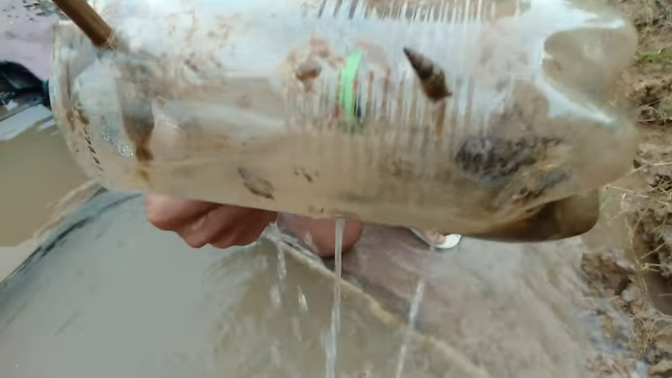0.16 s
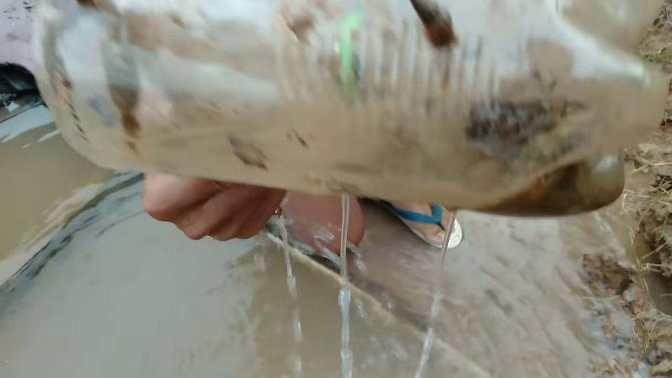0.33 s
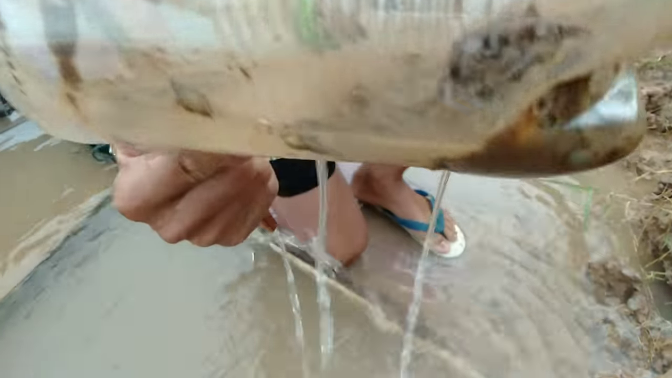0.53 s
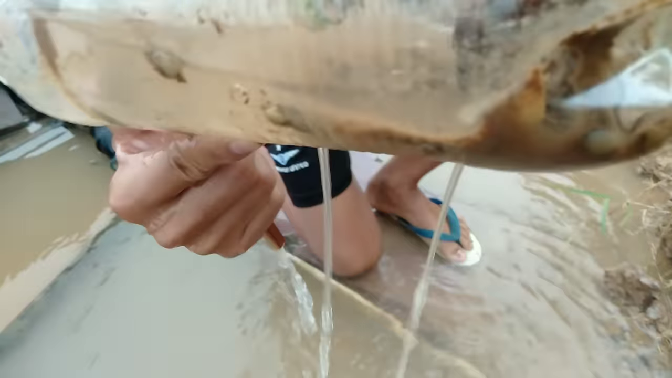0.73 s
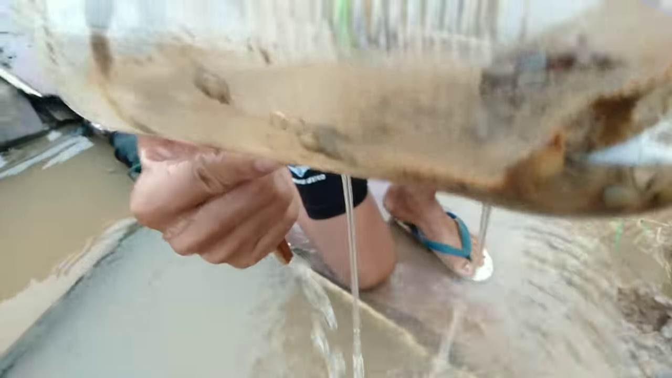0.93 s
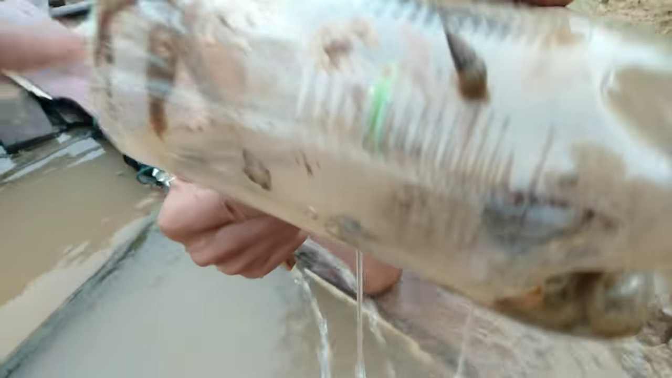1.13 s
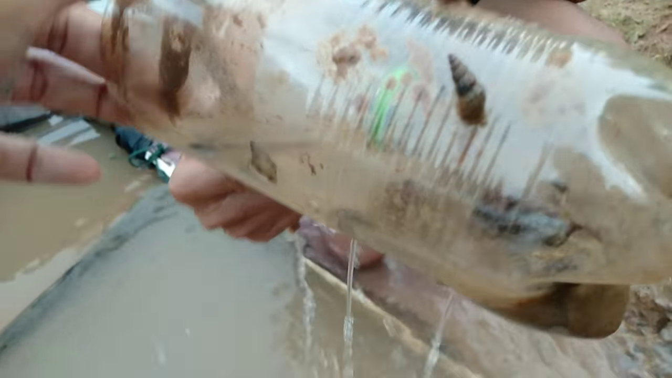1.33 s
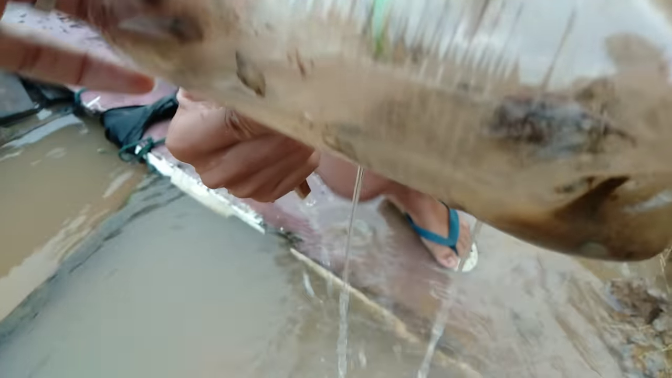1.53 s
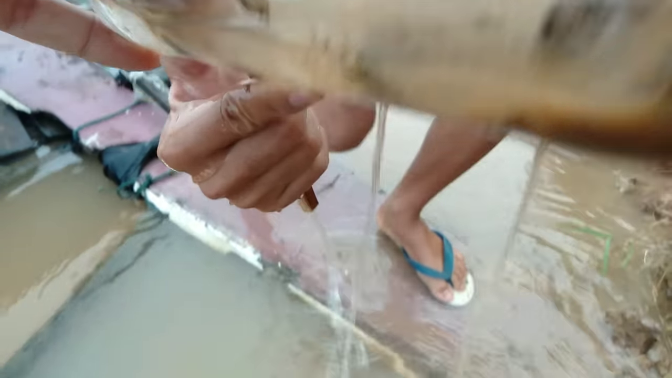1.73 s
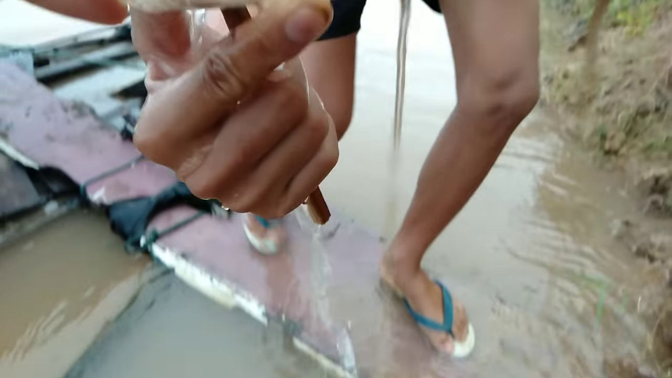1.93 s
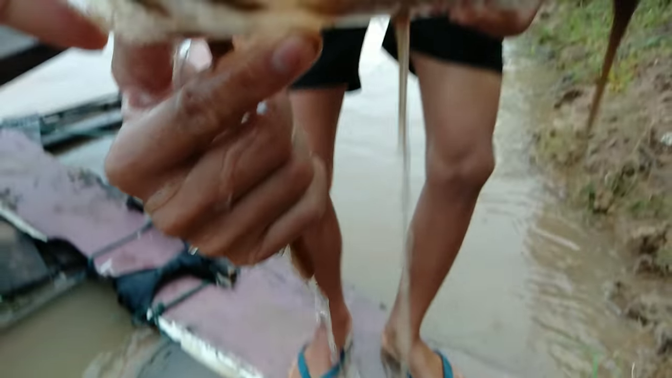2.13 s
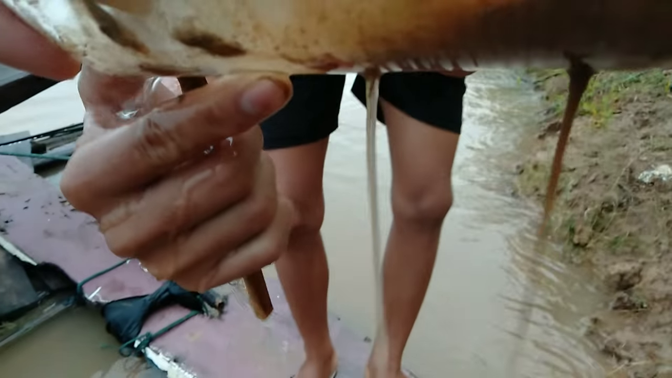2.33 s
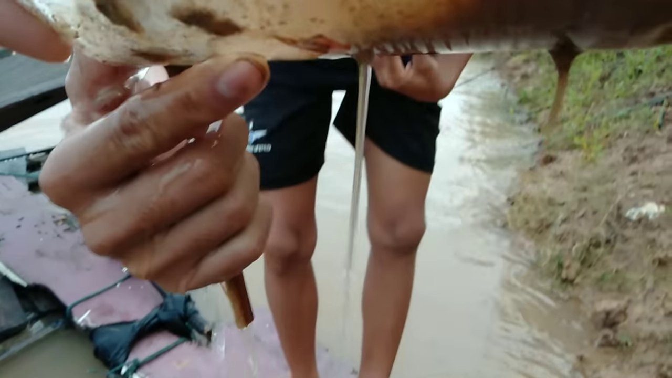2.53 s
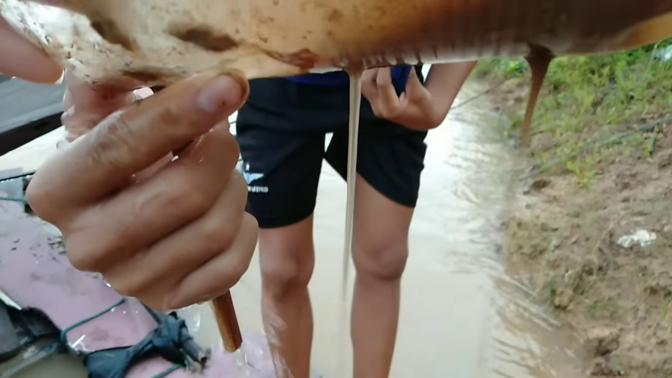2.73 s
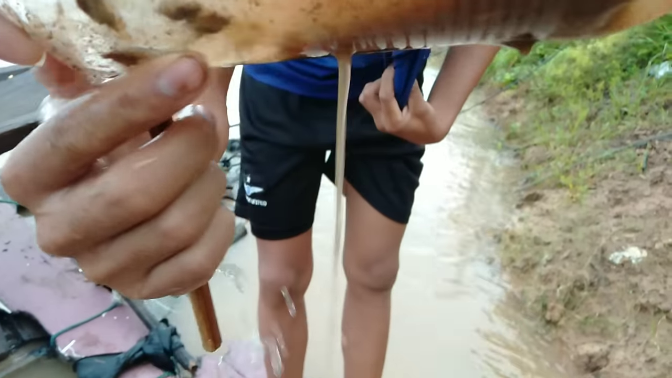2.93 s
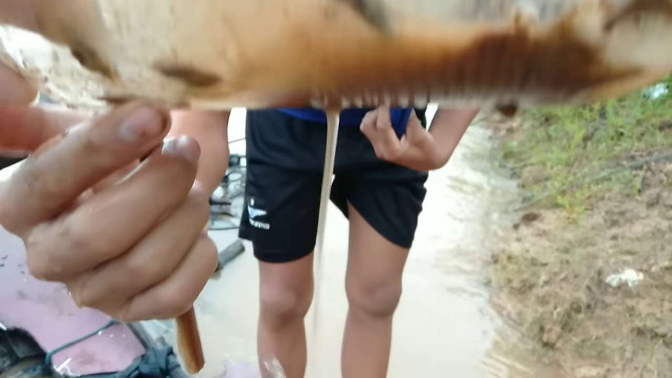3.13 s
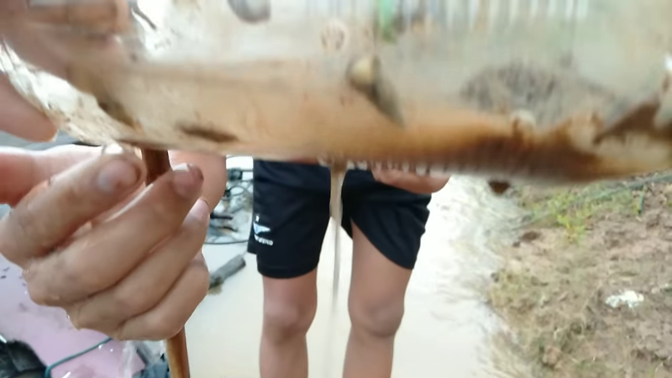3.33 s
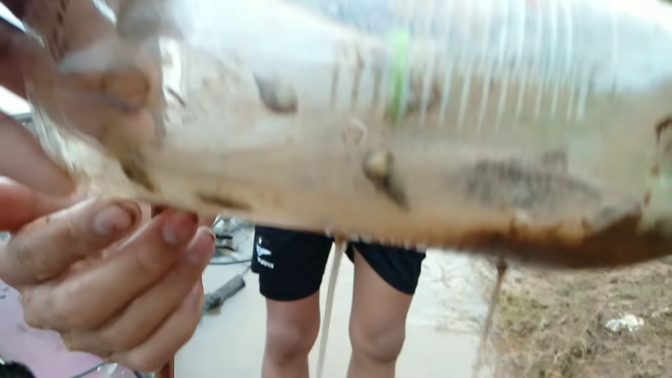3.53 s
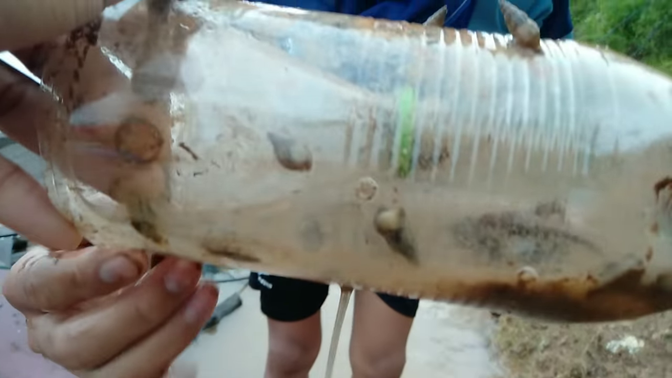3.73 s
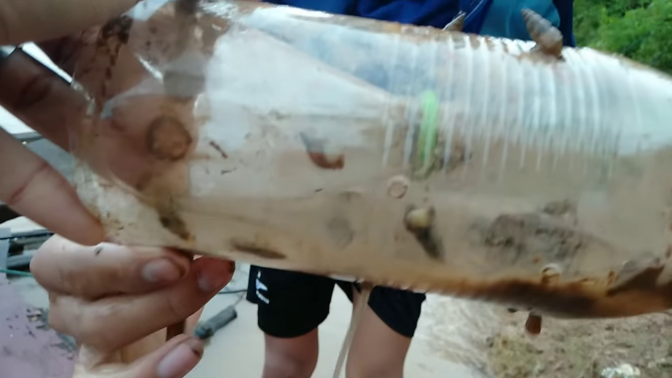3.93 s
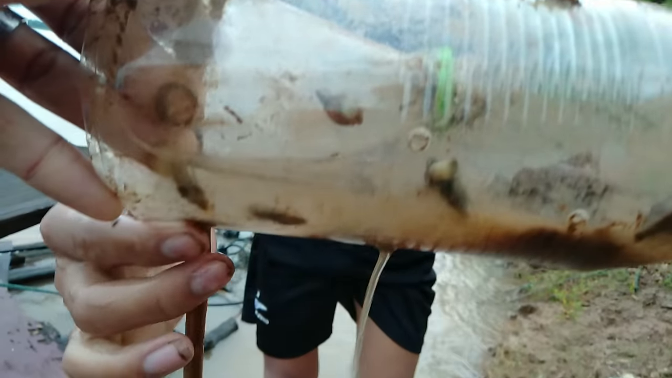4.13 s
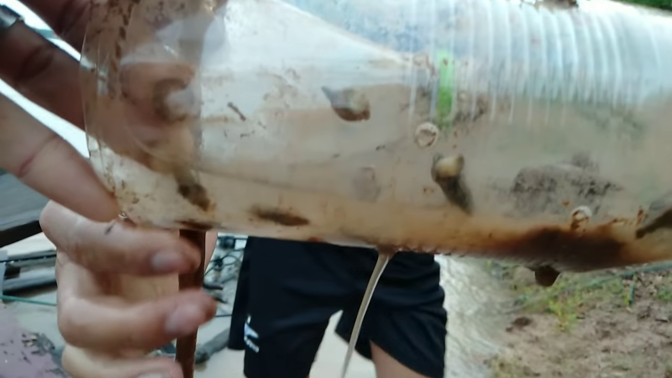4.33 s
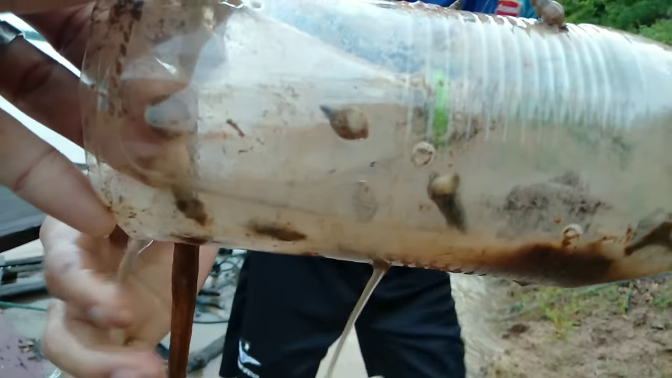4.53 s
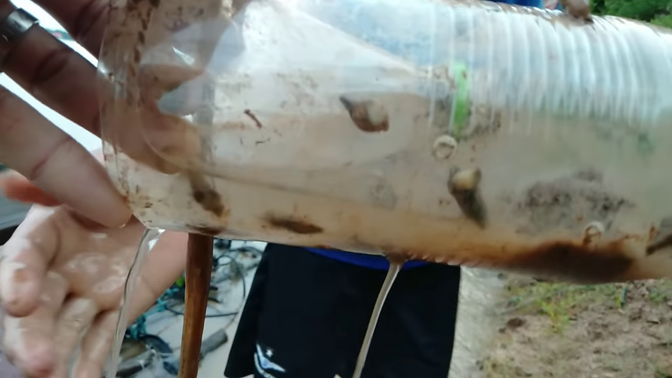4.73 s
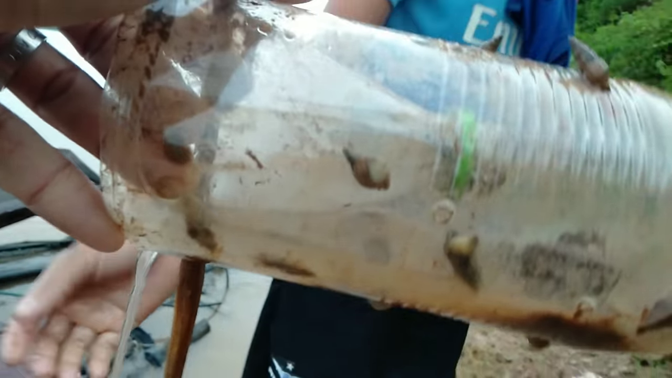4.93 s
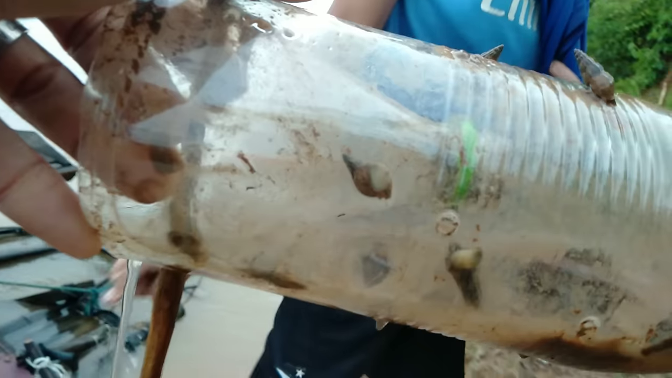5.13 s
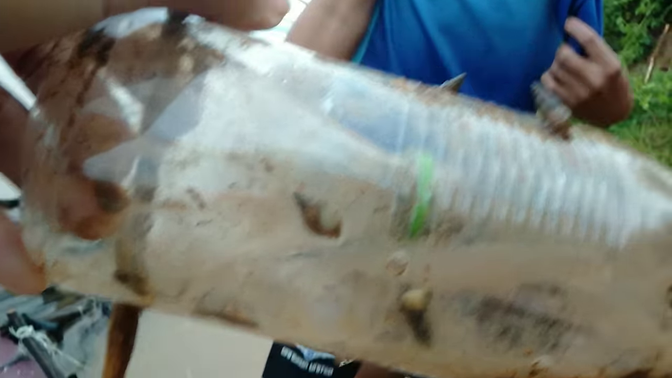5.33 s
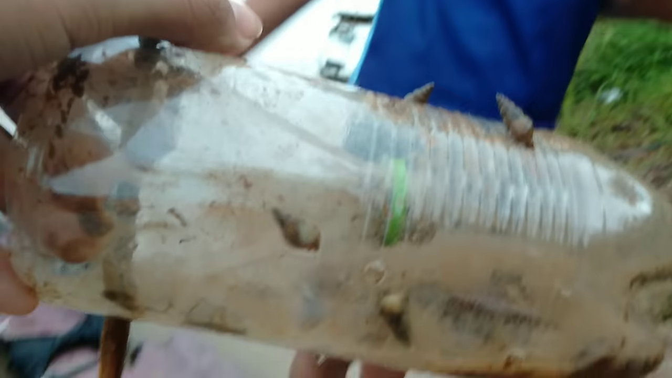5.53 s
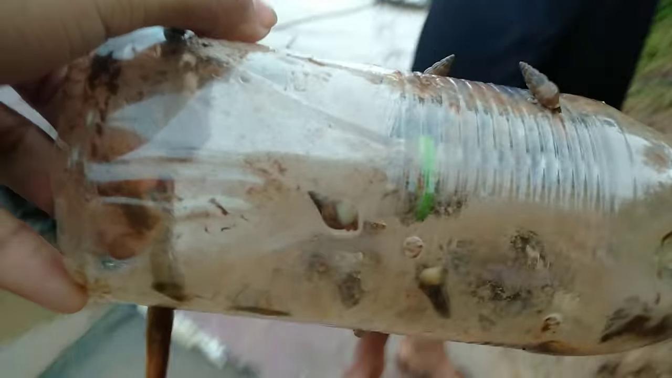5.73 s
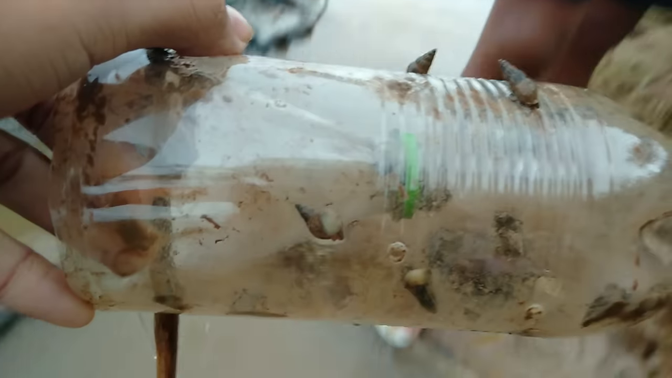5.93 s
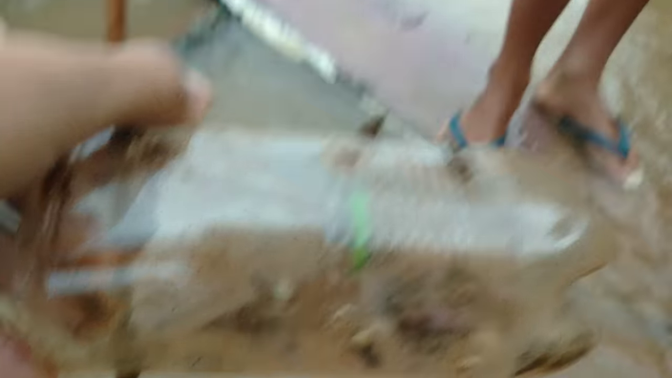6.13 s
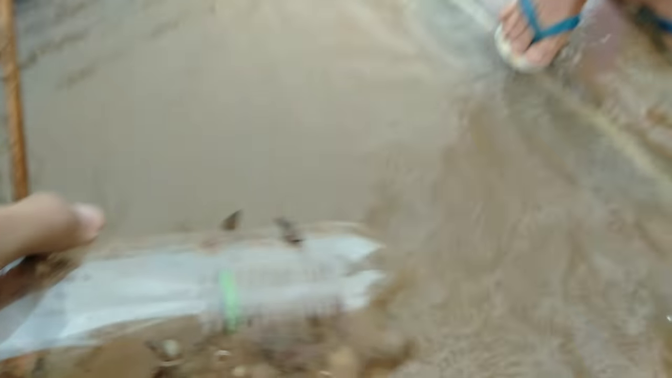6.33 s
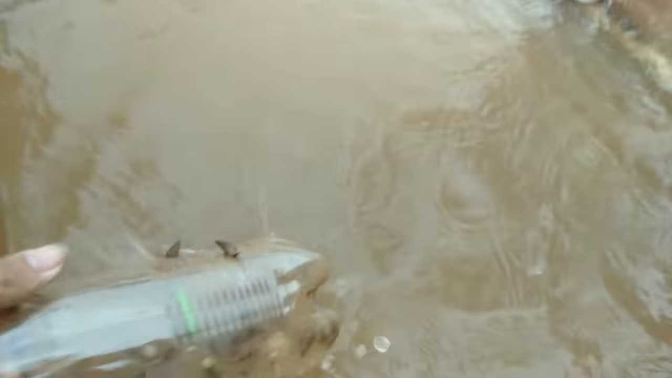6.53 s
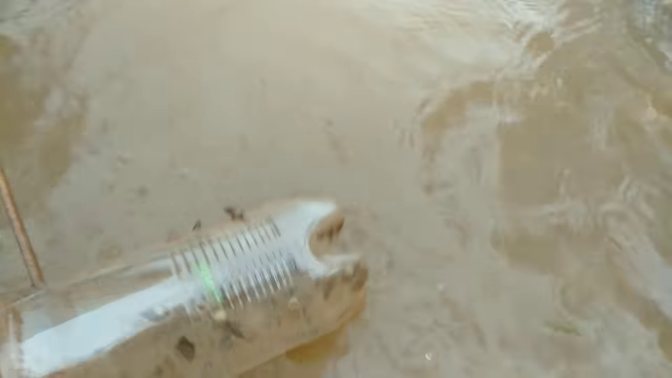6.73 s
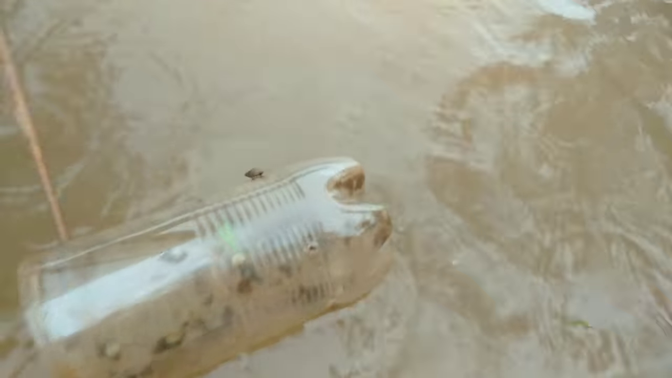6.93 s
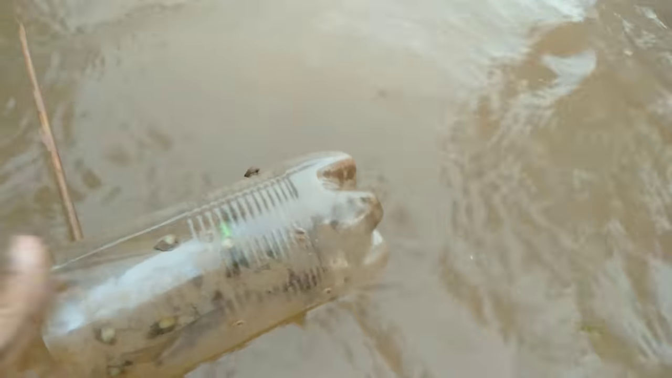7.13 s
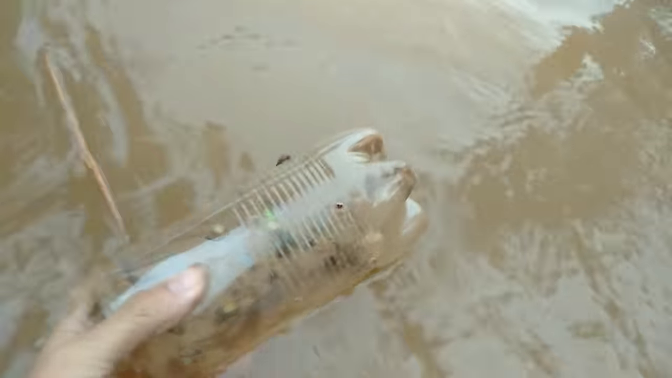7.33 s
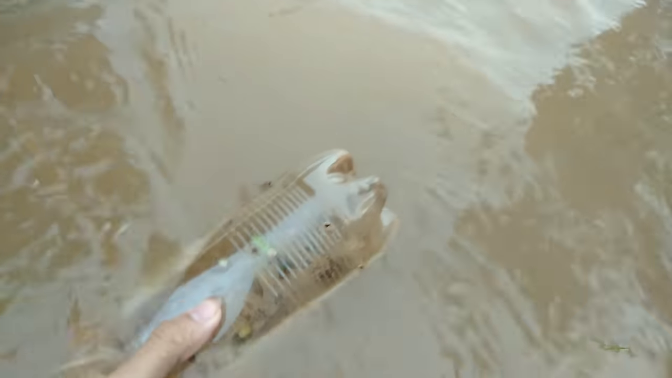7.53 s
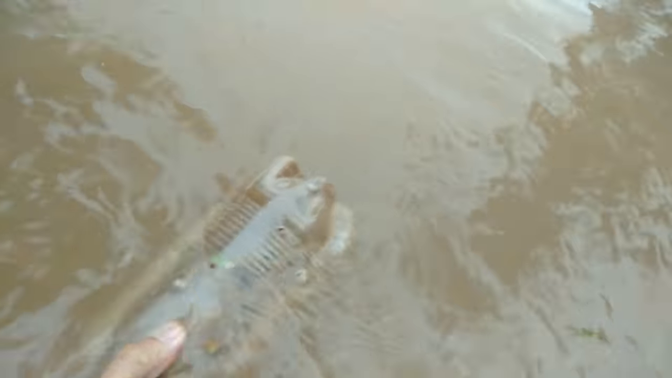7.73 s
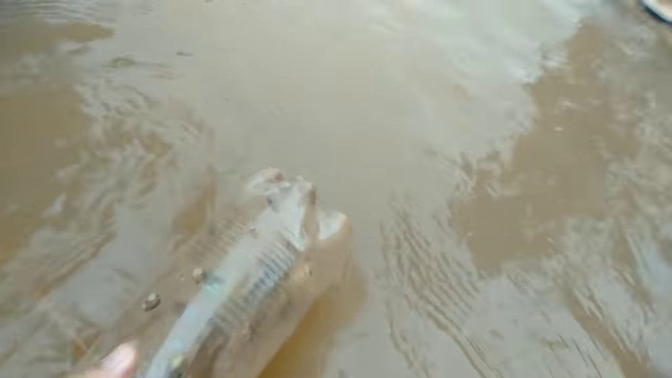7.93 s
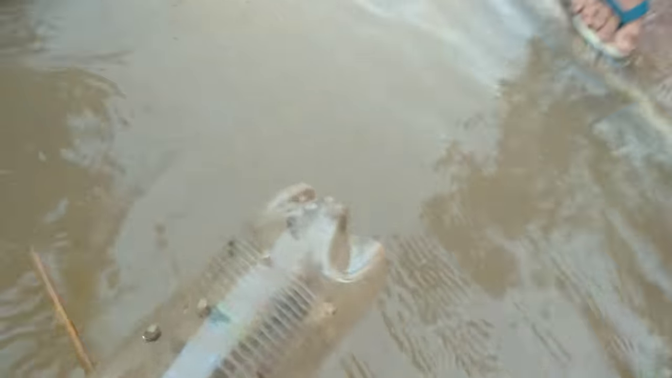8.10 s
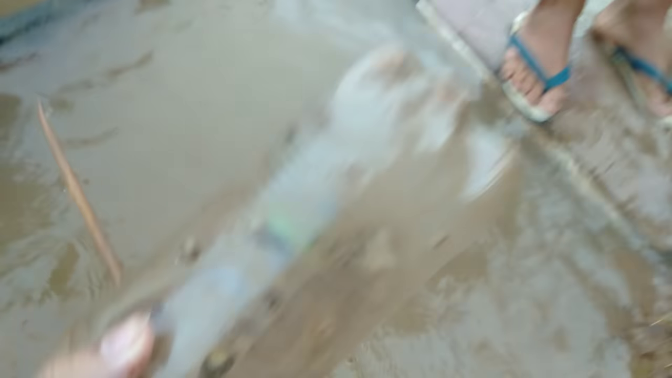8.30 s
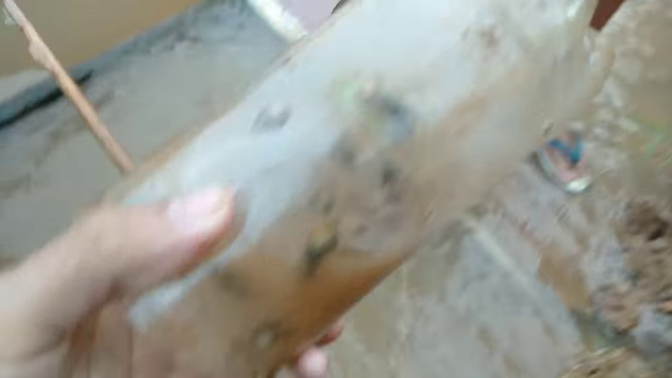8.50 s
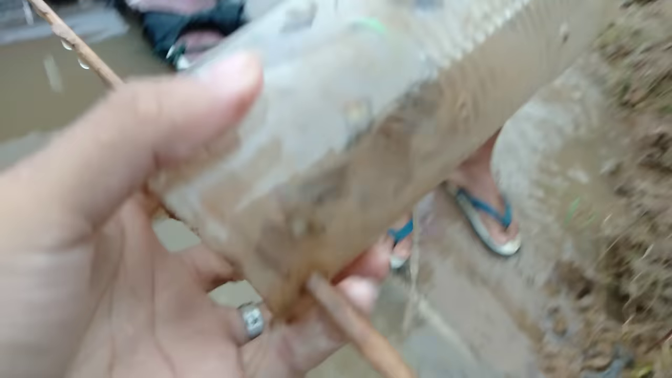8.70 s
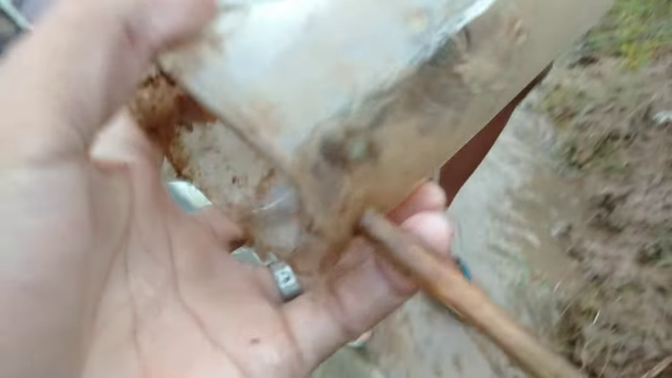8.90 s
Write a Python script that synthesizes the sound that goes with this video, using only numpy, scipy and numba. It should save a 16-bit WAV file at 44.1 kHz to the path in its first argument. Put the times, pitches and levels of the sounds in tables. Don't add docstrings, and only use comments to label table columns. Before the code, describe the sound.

Thin streams patter into shallow muddy water, bubbling and plinking, then break into separate drips. Dull hand thumps and hollow plastic knocks accompany the handling. The bottle is dipped with slaps, goes quieter, then comes up in a bright burst of splashing. Outdoors, close and dry on a phone, with husky falling bird whistles, brief trills from a second bird, a steady cricket and faint engine rumble.

```python
import sys
import numpy as np
from scipy import signal
from scipy.fft import rfft, irfft
from scipy.io import wavfile
from scipy.ndimage import uniform_filter1d
from numba import njit

SR = 44100
rng = np.random.default_rng(int(sys.argv[2]) if len(sys.argv) > 2 else 0)


def field_ratio(decibels):
    return 10 ** (np.asarray(decibels, dtype=float) / 20)


def file_out(sig):
    cols = np.atleast_2d(sig).T
    lim = np.clip(cols, -1, 1)
    pcm = np.round(lim * 32767).astype(np.int16)
    wavfile.write(sys.argv[1], SR, pcm)


N = 395121
TIME = np.arange(N) / SR


def add(out, start_s, sound):
    i = int(start_s * SR)
    out[i:i + len(sound)] += sound[:max(N - i, 0)]


def colour(x, points):
    hz, db = np.transpose(points)
    size = 8192
    grid_hz = np.maximum(np.fft.rfftfreq(size, 1 / SR), 1)
    cepstrum = irfft(np.interp(np.log(grid_hz), np.log(hz), db) * np.log(10) / 20)
    cepstrum[1:size // 2] *= 2
    cepstrum[size // 2 + 1:] = 0
    impulse = irfft(np.exp(rfft(cepstrum)))[:size // 2]
    return signal.fftconvolve(x, impulse)[:len(x)]


def walk(rate_hz):
    hold = int(SR / rate_hz)
    steps = np.repeat(rng.standard_normal(N // hold + 1), hold)
    return uniform_filter1d(steps, hold)[:N]


def level(x, db):
    return x * field_ratio(db) / np.sqrt(np.mean(x ** 2))


def echo(x, length, start_db, t60_s):
    tail = rng.standard_normal(length) * field_ratio(start_db - 60 * TIME[:length] / t60_s)
    return signal.fftconvolve(x, tail)[:N]


@njit
def grains(start, hz, cycles, size, glide, count):
    out = np.zeros(count)
    for k in range(len(start)):
        n = cycles[k] * SR / hz[k]
        w = 2 * np.pi * hz[k] / SR
        decay = np.exp(-np.log(1000) / n)
        climb = glide[k] ** (1 / n)
        phase, a = 0., size[k]
        for i in range(start[k], min(start[k] + int(n), count)):
            out[i] += a * np.sin(phase)
            phase += w
            w = min(w * climb, 3.)
            a *= decay
    return out


def glide_tone(length_s, start_hz, end_hz, bend, wobble):
    u = np.arange(int(length_s * SR)) / (length_s * SR)
    phase, speed = rng.random(size=2)
    shake = 1 + wobble * np.sin(2 * np.pi * (phase + u * length_s * 70 * (.5 + speed)))
    hz = start_hz * (end_hz / start_hz) ** (u ** bend) * shake
    return u, np.sin(2 * np.pi * np.cumsum(hz) / SR)


# frequency in Hz, density in dB per Hz.
AIR_SPECTRUM = [(30, -3.5), (60, 0.5), (165, -4.5), (285, -16), (1300, -21.5), (2990, -25), (3520, -42),
                (3900, -34), (4610, -22), (5730, -38), (14400, -27), (16000, -29)]


def air():
    firing = np.arange(.022 * SR, N, SR / 13.8).astype(int)
    steady = np.ones(len(firing))
    stroke_amp = field_ratio(-55 + rng.standard_normal(len(firing)))
    engine = grains(firing, 105 * steady, 3.9 * steady, stroke_amp, steady, N)
    return level(colour(rng.standard_normal(N), AIR_SPECTRUM), -64.5) + engine


# time in seconds, level in dB.
CRICKET_LEVEL = [
    (0, -78),
    (2.2, -71),
    (5.9, -67),
    (7.2, -78),
    (7.45, -68.5),
    (8.96, -68),
]


def cricket():
    throb_hz = 24 * (1 + 0.195 * walk(3.8))
    throb = 1 + 0.69 * np.sin(2 * np.pi * np.cumsum(throb_hz) / SR)
    wing_hz = 4650 * (1 + .011 * walk(150))
    wing = np.sin(2 * np.pi * np.cumsum(wing_hz) / SR)
    level_db = np.interp(TIME, *np.transpose(CRICKET_LEVEL)) + 2.2 * walk(45)
    return field_ratio(level_db) * throb * wing


def phrase(first_s, last_s, gap_s, top_db, swell_db):
    count = int(round((last_s - first_s) / gap_s)) + 1
    return zip(np.linspace(first_s, last_s, count), top_db - swell_db * np.arange(count)[::-1])


# first note in seconds, last note in seconds, start pitch in Hz, level in dB.
SHORT_WHISTLES = [(.47, .585, 3330, -56), (.93, .93, 3440, -61), (1.33, 1.33, 3400, -61),
                  (1.74, 1.74, 3350, -59), (2.142, 2.232, 3120, -50), (2.343, 2.422, 3390, -55),
                  (2.815, 2.815, 3450, -52.5), (3.178, 3.178, 3400, -51), (3.11, 3.11, 3340, -55),
                  (3.883, 3.957, 3420, -53), (4.488, 4.583, 3080, -47.5), (5.06, 5.06, 3377, -53),
                  (5.38, 5.443, 3350, -63), (6.075, 6.075, 3230, -57.5), (6.6, 6.6, 3320, -52),
                  (6.991, 6.991, 3400, -51), (7.24, 7.24, 3270, -63), (7.291, 7.293, 3390, -51.5),
                  (7.467, 7.547, 3046, -46.5), (7.732, 7.885, 3350, -60)]
DRAWN_WHISTLES = [
    (3.514, 3.582, 3290, -48.5),
    (6.135, 6.21, 3280, -48.5),
    (7.368, 7.369, 3330, -52.5),
]


def whistles(out):
    notes = [(*row, .045) for row in SHORT_WHISTLES] + [(*row, .062) for row in DRAWN_WHISTLES]
    for first_s, last_s, start_hz, top_db, length_s in notes:
        for s, db in phrase(first_s, last_s, .078, top_db, 0):
            u, tone = glide_tone(length_s, start_hz, start_hz - 10000 * length_s, 0.99, 0.0097)
            add(out, s, field_ratio(db - 5) * np.sin(np.pi * u) ** 0.28 * tone)


# first note in seconds, last note in seconds, level in dB.
TRILL_PHRASES = [
    (3.277, 3.4, -42),
    (3.557, 3.639, -42),
    (8.07, 8.111, -40),
    (8.277, 8.317, -43.5),
]


def trills(out):
    for first_s, last_s, top_db in TRILL_PHRASES:
        for s, db in phrase(first_s, last_s, .04, top_db, 2.5):
            u, tone = glide_tone(.024, 5100, 4100, 1, .012)
            add(out, s, field_ratio(db - 1.5) * np.sin(np.pi * u) * tone)
            u, tone = glide_tone(.028, 5150, 4600, 1, .015)
            add(out, s + 0.0035, field_ratio(db - 13.5) * np.sin(np.pi * u) * tone)


def insect_whine(out):
    t = TIME[:9500]
    hz = 14750 - 2500 * t - 250 * np.cos(2 * np.pi * 11 * (t + .015))
    whine = np.sin(2 * np.pi * np.cumsum(hz) / SR)
    add(out, 5.965, field_ratio(-75) * whine * np.hanning(len(t)) ** .5)


def birds():
    out = np.zeros(N)
    whistles(out)
    trills(out)
    out *= field_ratio(3.5 * walk(160))
    insect_whine(out)
    return out + echo(out, 4000, -25.5, 0.059)


# start in seconds, peak in dB.
HAND_THUDS = [
    (1.174, -49),
    (1.289, -49.5),
    (1.373, -48),
    (5.662, -51.5),
    (6.755, -46),
    (7.561, -46),
]


def thuds():
    s, db = np.transpose(HAND_THUDS)
    hz = 258 * (0.85 + 0.23 * rng.random(len(s)))
    return grains((s * SR).astype(int), hz, np.full(len(s), 8.6), field_ratio(db), np.ones(len(s)), N)


# start in seconds, peak in dB, wall mode in Hz.
WALL_BUMPS = [
    (4.533, -35.5, 970),
    (4.651, -35, 704),
    (6.243, -38.5, 864),
    (6.547, -29.5, 1150),
    (6.573, -31.5, 1060),
    (7.56, -35.5, 590),
]


def bumps():
    s, db, hz = np.repeat(np.transpose(WALL_BUMPS), 3, axis=1)
    hz = hz * np.tile([.4, 1, 1.5], len(WALL_BUMPS))
    db = db + np.tile([-28, -3, -5], len(WALL_BUMPS))
    return grains((s * SR).astype(int), hz, hz * 0.021, field_ratio(db), np.ones(len(s)), N)


def patter(rate_hz, low_hz, high_hz, cycles, spread_db, glide):
    chance = rng.random((int(rate_hz * N / SR), 4)).T
    start = (chance[0] * N).astype(int)
    size_db = np.minimum(-np.log(1 - chance[1]), 3.5) * spread_db
    size = field_ratio(size_db + 3.5 * walk(30)[start])
    hz = low_hz * (high_hz / low_hz) ** chance[2]
    ring_cycles = cycles * (0.33 + 3.8 * chance[3])
    return level(grains(start, hz, ring_cycles, size, np.full(len(start), glide), N), 0)


def drops(s, db, hz, ring_s, scatter, count):
    depth = (3000 / hz[:, None]) ** .4
    t60_s = np.clip(ring_s * field_ratio(.3 * (db + 30)), .4 * ring_s, 1.2 * ring_s)[:, None] * depth
    chance = rng.random((len(s), count, 3))
    others = np.arange(count) > 0
    late_s = .3 * t60_s * chance[..., 0] ** 2 * others
    octaves = scatter * (chance[..., 1] - .5) * others
    pitch = np.minimum(hz[:, None] * 2 ** octaves, .4 * SR)
    size = field_ratio(db[:, None] - 30 * late_s / t60_s - 14.5 * chance[..., 2] * others)
    start = ((s[:, None] + late_s) * SR).astype(int)
    climb = np.repeat(1 + 0.21 * depth ** 2, count)
    return grains(start.ravel(), pitch.ravel(), (pitch * t60_s).ravel(), size.ravel(), climb, N)


def droplets(rate_hz, low_hz, high_hz, ring_s, spread_db):
    chance = rng.random((int(rate_hz * N / SR), 3)).T
    s = chance[0] * N / SR * .999
    db = -30 + spread_db * np.minimum(-np.log(1 - chance[1]), 2.5)
    hz = low_hz * (high_hz / low_hz) ** chance[2]
    return level(drops(s, db, hz, ring_s, 1.18, count=5), 0)


def bursts(s, db, t60_s, hz=None):
    out, t = np.zeros(N), TIME[:3000]
    for k in range(len(s)):
        noise = rng.standard_normal(len(t))
        if hz is not None:
            peak = signal.iirpeak(hz[k], 1.1, fs=SR)
            noise = signal.lfilter(*peak, signal.lfilter(*peak, noise))
            noise = level(noise, 0) * np.minimum(t / 0.00041, 1)
        add(out, s[k], field_ratio(db[k] - 60 * t / t60_s) * noise)
    return out


# frequency in Hz, gain in dB.
MIC_RESPONSE = [(200, -33.5), (450, -6.5), (650, 3.5), (1500, 1), (3000, 3.5), (5000, 7.5), (6200, -6),
                (9000, -2), (11000, -15), (15000, -68)]


def near_mic(x):
    return colour(x, MIC_RESPONSE)


# time in seconds, patter of drops in dB, small bubbles in dB.
FLOW_LEVELS = [(0.0, -55.5, -48), (0.8, -58, -61.5), (1.35, -51.5, -50.5), (2.05, -58, -51.5),
               (2.42, -58, -53), (4.4, -59, -69.5), (4.67, -53, -63), (4.99, -60, -79),
               (5.47, -53.5, -53.5), (5.99, -66.5, -83), (6.24, -61.5, -76), (6.96, -60.5, -56),
               (7.39, -73.5, -83), (7.68, -70.5, -70.5), (7.98, -58, -58), (8.56, -48, -75),
               (8.78, -62, -87), (8.96, -56.5, -80)]


def stream():
    s, drops_db, _ = np.transpose(FLOW_LEVELS)
    mist = field_ratio(-18) * patter(1500, 5070., 15100., cycles=28., spread_db=4., glide=0.88)
    mist = mist + field_ratio(-15) * droplets(90, 5800., 15100., 0.0039, spread_db=5.)
    fizz = field_ratio(-7) * patter(1100, 1500., 6500., cycles=16., spread_db=3., glide=1.25)
    chance = rng.random((450, 2)).T
    click_db = -4.5 * np.log(1 - .9 * chance[1])
    clicks = level(bursts(chance[0] * N / SR, click_db, 0.03), -2.7)
    chirps = field_ratio(-5) * patter(130, 1005., 3800., cycles=17.2, spread_db=5., glide=1.59)
    plinks = field_ratio(-6) * droplets(95, 1388., 6300., .014, spread_db=6.)
    body = near_mic(fizz + field_ratio(-2) * clicks + chirps + plinks)
    edge = field_ratio(-19.5) * np.diff(clicks, prepend=0)
    return field_ratio(np.interp(TIME, s, drops_db) + 2.7 * walk(16)) * (mist + body + edge)


# start in seconds, peak in dB, ring in Hz.
LESSER_DROPS = [(0.1703, -36.5, 4650.0), (0.2256, -35.5, 3900), (0.3235, -39.5, 2360), (0.4745, -35.5, 3200),
                (0.6296, -41, 4130.0), (0.7344, -36, 1420), (0.872, -36, 4820), (1.1042, -37, 1720.0),
                (1.193, -35, 3760), (1.2316, -41, 2360), (1.2885, -34, 3960), (1.3235, -36, 1700),
                (1.3807, -37, 4050), (1.4153, -33.5, 2110), (1.4758, -39.5, 4350), (1.5243, -35.5, 2570),
                (1.5328, -37, 1670), (1.5523, -36, 3000), (1.6048, -41, 2370.0), (1.8166, -40, 5000),
                (1.8328, -41.5, 1920), (1.8965, -39, 3700), (1.9493, -41, 1760), (2.022, -37, 3600),
                (2.1732, -37, 2220), (2.2459, -41, 2950), (2.6588, -43, 4170), (2.7087, -40, 5400),
                (2.8667, -39.5, 4430), (2.8803, -36, 3720), (3.0148, -41.5, 3900),
                (3.796, -39, 4300), (3.8429, -38, 2040), (3.851, -38, 4700), (4.01, -36.5, 2490),
               (4.1143, -33.5, 3440), (4.2707, -41, 3870), (4.293, -40.5, 4830), (4.3294, -42, 3550.0),
               (4.4125, -44, 2040), (4.4954, -37, 1580), (4.5051, -43, 3560), (4.6814, -36.5, 4440),
               (4.7116, -30.5, 2490), (4.775, -41, 4600), (4.788, -35, 2390.0), (4.829, -39, 1460),
               (5.0083, -38.5, 4420), (5.1534, -40, 4380), (5.223, -40, 2400), (5.3432, -39, 3200),
               (5.381, -36.5, 1470), (5.7912, -40, 2520), (5.821, -37, 1820), (5.8787, -38.5, 2130),
               (6.1945, -40.5, 3950), (6.2575, -38.5, 2700), (6.434, -39, 2400), (6.453, -39.2, 1740.0),
               (6.7327, -29, 3140), (6.865, -38, 2210), (6.9004, -29.5, 1860), (6.91, -35, 3530.0),
               (7.0904, -31, 1510), (7.6753, -44, 4150), (7.826, -39, 1970), (7.851, -34.5, 1650),
               (7.885, -34, 1630), (7.92, -41.5, 3080), (8.111, -44.5, 2860), (7.9002, -37.5, 1650),
               (8.025, -35.5, 4840.0), (8.0542, -37, 2010), (8.1568, -40, 2500), (8.381, -33, 5330),
               (8.4227, -32, 4200), (8.44, -33, 4900), (8.5287, -46, 3190.0), (8.5491, -38, 1260),
               (8.5801, -34, 1760), (8.6048, -39, 5380.0), (8.6773, -34, 5370), (8.795, -38.5, 4200),
               (8.8744, -39.5, 3570)]


def small_drops():
    s, db, hz = np.transpose(LESSER_DROPS)
    ring = field_ratio(-4) * drops(s, db, hz, 0.019, 0.96, count=4)
    crack = bursts(s, db - 7.5, 0.0097, hz)
    spray = bursts(s, db - 14, 0.041, hz)
    return near_mic(ring + crack + spray)


# start in seconds, peak in dB, ring in Hz.
POUR_DROPS = [(.013, -32, 2910), (.079, -34, 4600), (0.153, -30, 3020), (0.257, -30.5, 1490),
              (0.2896, -30, 1780), (0.346, -30.5, 3760), (0.5073, -30, 4130), (0.5599, -32, 2400),
              (0.7004, -34, 4420), (0.7814, -32, 2340), (0.811, -31, 2100), (0.8761, -29, 1570),
              (0.9339, -33.5, 1610), (1.1633, -33, 3040), (1.213, -34, 2430), (1.2748, -29, 1770),
              (1.461, -36.5, 4450), (1.591, -32.5, 4970), (1.916, -28.5, 1330), (1.9572, -26.5, 3510),
              (2.368, -34, 2140), (2.468, -34.5, 2600), (2.512, -34, 5200)]
DRIBBLE_DROPS = [(2.9659, -28.5, 3480), (3.032, -31, 5500), (3.1262, -28, 1700), (3.159, -30, 1470),
                 (3.3203, -29.5, 2000), (3.5048, -26, 4280), (3.699, -30.5, 2400), (3.788, -35.5, 4040),
                 (3.8346, -33.5, 2380), (3.8806, -34, 2850), (3.935, -33.5, 1880), (4.084, -30.5, 4040),
                 (4.149, -32, 1500), (4.2035, -34, 3950), (4.5349, -32, 4020), (4.662, -30.5, 3060),
                 (4.697, -26.5, 1860), (4.74, -29, 4180), (5.127, -30.5, 2270), (5.3124, -24, 3400),
                 (5.3732, -32, 3140), (5.4874, -33.5, 1740), (5.533, -31.5, 2220), (5.554, -31.5, 4100),
                 (5.638, -36, 4200), (5.907, -29.5, 4680)]
DUNK_SLAPS = [(6.2462, -28, 1400), (6.5484, -26, 4270), (6.56, -25, 2540), (6.726, -27.5, 3230),
              (6.762, -30.5, 3660), (6.81, -34.5, 1500), (8.012, -34.5, 4420), (6.8842, -32, 1810),
              (6.9213, -23.5, 2310), (7.1195, -31, 2860), (7.2302, -35.5, 1560), (7.561, -29, 1644),
              (7.579, -33.5, 3600), (7.7346, -34.5, 2250), (7.7874, -39.5, 2920), (7.85, -28.5, 3200),
              (7.9983, -29, 1340), (8.218, -24.5, 2290), (8.2368, -24, 2940), (8.3569, -20.5, 4670),
              (8.4107, -30, 3870), (8.453, -29, 2940), (8.4867, -24.5, 4010), (8.4996, -27.5, 3720),
              (8.6177, -32, 5620), (8.6962, -29, 3280), (8.7212, -24, 2380), (8.7274, -20.5, 3004),
              (8.822, -34, 5750), (8.925, -33, 3920)]
# start in seconds, peak in dB, centre in Hz.
BRIGHT_TICKS = [(0.5043, -42, 5760), (0.812, -27.5, 14800), (1.258, -34, 6100), (1.461, -29, 8600),
                (3.5052, -25, 7460), (3.7866, -31.5, 8200), (3.852, -32.5, 8570), (4.799, -34.5, 7440),
                (5.009, -32.5, 8770), (5.641, -28.5, 8000), (5.905, -35.5, 5900), (6.547, -41, 6600),
                (6.564, -24.5, 8740), (6.7247, -38, 8000), (6.774, -34, 8950), (6.9, -31, 8400),
                (6.923, -35, 8500), (7.091, -42, 8100), (7.58, -34, 8540), (6.06, -39.5, 8450),
                (6.14, -38.5, 6100), (6.26, -42, 11000), (7.685, -47, 7000), (8.4115, -35.5, 8400),
                (8.456, -25.5, 7440), (8.5, -32.5, 8900), (8.8746, -32, 7100)]
FINE_SPRAY = [
    (0.153, -38.5, 9400),
    (1.0331, -39, 11400),
    (1.591, -36.5, 9500),
    (1.714, -43, 9200),
    (1.9565, -41, 9150),
    (2.1779, -47, 9700),
]


def splashes():
    s, db, hz = np.transpose(POUR_DROPS + DRIBBLE_DROPS + DUNK_SLAPS)
    ring = field_ratio(-6.5) * drops(s, db, hz, 0.019, 0.95, count=6)
    spray = bursts(s, db - 17, 0.051, hz)
    slap = bursts(s, db - 8.5, 0.0071, hz) + bursts(s, db - 12.5, 0.006)
    tick_s, tick_db, tick_hz = np.transpose(BRIGHT_TICKS + FINE_SPRAY)
    ticks = field_ratio(-4.5) * drops(tick_s, tick_db, tick_hz, 0.0096, 1.21, count=9)
    crack = np.diff(bursts(tick_s, tick_db - 28, 0.0048), prepend=0)
    return near_mic(ring + spray + slap) + ticks + crack


def small_gulps(rate_hz):
    chance = rng.random((int(rate_hz * N / SR), 5)).T
    s = chance[0] * N / SR
    start_hz = 590 * 2.8 ** chance[1]
    flow_s, _, bubbles_db = np.transpose(FLOW_LEVELS)
    stopped = s > 7.2
    db = np.interp(s, flow_s, bubbles_db) + 3 - 9 * chance[2] - 40 * stopped
    length_s = (6 + 16 * chance[3]) / start_hz
    end_hz = start_hz * (1.2 + .9 * chance[4])
    return list(zip(s, length_s, start_hz, end_hz, db))


# start in seconds, length in seconds, start pitch in Hz, level in dB.
CALM_CAVITIES = [(.075, 0.03, 646, -53), (.593, 0.044, 785, -51.5), (.734, 0.045, 632, -43.5),
                 (.81, 0.012, 950, -44), (.967, 0.012, 976, -42), (1.09, 0.05, 732, -46.5),
                 (1.057, 0.021, 650, -35.5), (1.169, 0.019, 640, -47), (1.275, 0.051, 737, -49.5),
                 (.97, 0.016, 742, -38), (1.39, 0.038, 571, -51), (1.439, 0.045, 632, -48),
                 (1.58, 0.016, 664, -46.5), (1.657, 0.031, 628, -49.5), (1.704, 0.0093, 770, -40),
                 (2.144, 0.045, 673, -48), (2.192, 0.006, 1000, -41), (2.367, 0.025, 850, -48),
                 (3.126, 0.019, 1755, -44), (3.535, 0.023, 857, -57.5), (3.593, 0.024, 850, -54),
                 (3.229, 0.027, 957, -51.5), (3.922, 0.015, 622, -46), (4.279, 0.0085, 1034, -44),
                 (3.989, 0.04, 672, -54), (5.061, 0.015, 1028, -50), (5.854, 0.058, 717, -48.5),
                 (6.241, 0.008, 880, -37.5), (6.899, 0.019, 663, -40), (8.118, 0.022, 910, -57)]
FILLING_CAVITIES = [(.109, 0.029, 607, -44.5), (.155, 0.033, 935, -43.5), (.41, 0.012, 920, -45),
                    (.941, 0.054, 575, -53.5), (1.354, 0.02, 934, -45), (1.918, 0.03, 596, -52),
                    (1.995, 0.041, 594, -40), (2.106, 0.027, 750, -44), (2.181, 0.047, 623, -49.5),
                    (2.236, 0.031, 650, -47.5), (2.277, 0.046, 618, -48), (2.721, 0.012, 895, -45),
                    (2.75, 0.022, 820, -43.5), (2.777, 0.083, 599, -52), (2.984, 0.025, 1010, -50),
                    (3.885, 0.087, 474, -59), (4.235, 0.011, 870, -45.5), (4.479, 0.015, 1055, -48.5),
                    (4.651, 0.027, 643, -48), (4.944, 0.059, 607, -51), (5.193, 0.054, 535, -49.5),
                    (6.885, 0.026, 1644, -37.5), (8.008, 0.018, 1200, -38), (8.483, 0.011, 638, -41.5),
                    (8.536, 0.043, 555, -43), (3.157, 0.017, 1296, -45), (8.053, 0.011, 1110, -49),
                    (8.07, 0.013, 1010, -59), (8.089, 0.01, 925, -60), (8.692, 0.012, 1300, -53)]
CAVING_CAVITIES = [(.17, 0.044, 640, -48), (.523, 0.036, 660, -49), (.648, 0.02, 698, -39),
                   (.664, .022, 900, -41), (2.59, 0.021, 497, -53.5), (2.678, 0.021, 820, -52.5),
                   (3.143, 0.027, 626, -49.5), (3.664, 0.021, 1010, -50), (4.434, 0.016, 777, -44),
                   (5.277, 0.034, 535, -49.5), (5.483, 0.015, 722, -53), (7.063, 0.037, 718, -51.5),
                   (4.592, 0.018, 1160, -44.5), (8.627, 0.028, 573, -52.5), (8.718, 0.016, 1604, -31.5),
                   (8.765, 0.033, 836, -47.5), (4.78, 0.0088, 920, -63)]
MURMUR_CAVITIES = [(.184, 0.014, 906, -44.5), (.255, 0.016, 735, -50), (.378, 0.0072, 680, -46.5),
                   (.572, 0.012, 780, -48), (.685, 0.037, 573, -58), (1.011, 0.024, 734, -48),
                   (1.036, 0.013, 743, -45), (1.215, 0.05, 675, -55), (1.33, 0.0085, 687, -44),
                   (1.367, 0.023, 573, -50.5), (1.495, 0.022, 740, -56), (1.52, .02, 610, -55),
                   (1.54, 0.033, 662, -52), (1.615, 0.023, 760, -53), (1.657, 0.0095, 965, -47),
                   (1.74, 0.0078, 1030, -51), (1.895, 0.014, 947, -48), (2.167, 0.011, 1060, -45),
                   (2.831, 0.019, 783, -50), (2.52, 0.017, 690, -56), (4.71, 0.026, 474, -56.5),
                   (4.755, 0.0092, 680, -53), (7.955, 0.078, 594, -57.5), (5.175, 0.013, 418, -54),
                   (5.61, 0.0084, 970, -44), (6.218, 0.01, 1560, -46), (7.025, 0.0067, 900, -47.5),
                   (7.037, 0.0082, 1005, -46), (7.228, 0.0074, 1075, -47.5), (7.042, 0.018, 606, -50),
                   (8.287, 0.024, 770, -52), (8.465, 0.011, 1500, -46), (8.507, 0.0087, 1460, -46.5),
                   (8.646, 0.0075, 1630, -56), (8.929, 0.0054, 1580, -44)]
# start in seconds, length in seconds, start pitch in Hz, end pitch in Hz, level in dB.
FLOATING_HUM = (6.93, .37, 631, 634, -65)


def cavities():
    kinds = [(CALM_CAVITIES, 1.095), (FILLING_CAVITIES, 1.47),
             (CAVING_CAVITIES, 2.4), (MURMUR_CAVITIES, 1.13)]
    rows = [(s, length_s, hz, hz * rise, db) for table, rise in kinds for s, length_s, hz, db in table]
    return rows + [FLOATING_HUM]


def gulps():
    out = np.zeros(N)
    for s, length_s, start_hz, end_hz, db in small_gulps(rate_hz=40) + cavities():
        rise = end_hz / start_hz
        u, tone = glide_tone(1.35 * length_s, start_hz, start_hz * rise ** 1.5, 1.5, .045)
        attack = np.minimum(u * length_s / .0005, 1)
        closing = np.minimum((1 - u) / .35, 1) ** 1.5
        swell_db = 2.5 - 7.7 * u + 5.9 * u * np.log2(rise)
        add(out, s, field_ratio(db + swell_db) * attack * closing * tone)
    out *= field_ratio(2.3 * walk(130))
    highpass = signal.butter(3, 420, "high", fs=SR, output="sos")
    return signal.sosfilt(highpass, out + 1e-18)


def scene():
    background = air() + cricket() + birds() + thuds()
    water = bumps() + stream() + small_drops() + splashes() + gulps()
    water = water + echo(water, 3000, -31, 0.068)
    return (background + water)[None]


def low_pass(x):
    return signal.sosfilt(signal.butter(12, 16500, fs=SR, output="sos"), x)


def record(dry):
    lowpass = signal.ellip(6, .2, 25, 15500, fs=SR, output="sos")
    mix = signal.sosfilt(lowpass, dry)
    return low_pass(mix)


dry = scene()
out = record(dry)
file_out(out)
```